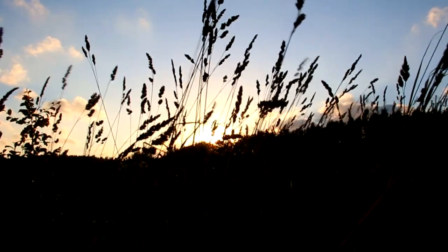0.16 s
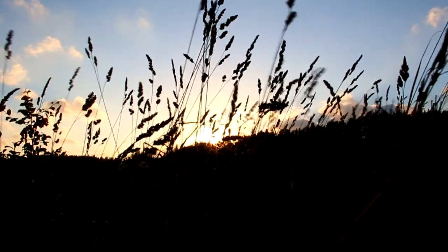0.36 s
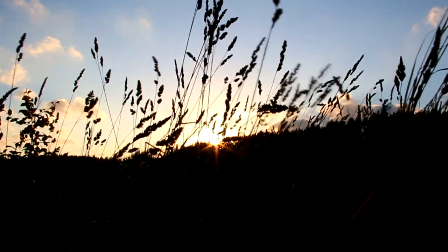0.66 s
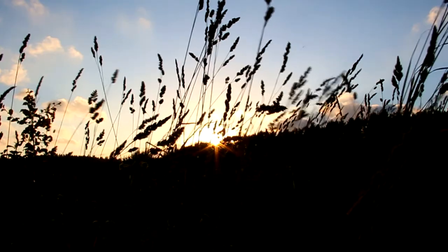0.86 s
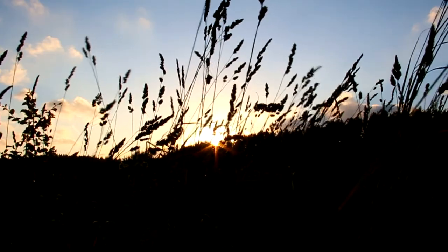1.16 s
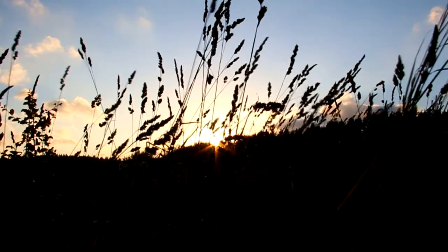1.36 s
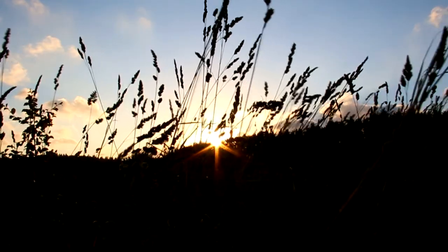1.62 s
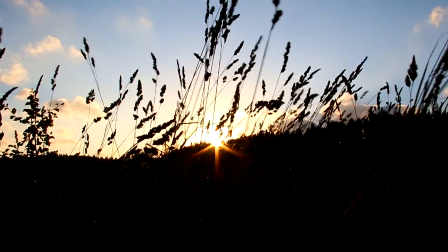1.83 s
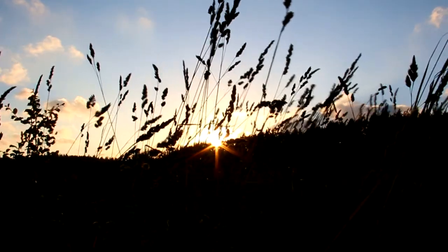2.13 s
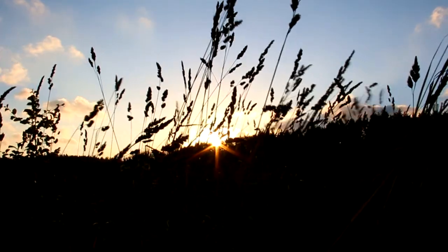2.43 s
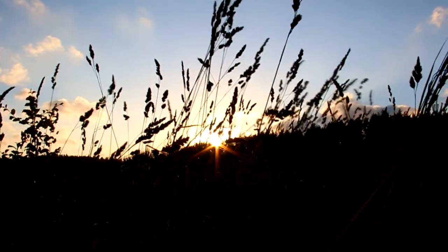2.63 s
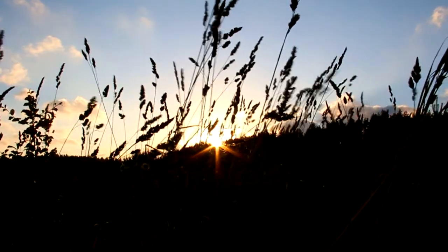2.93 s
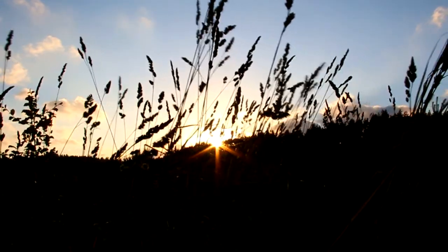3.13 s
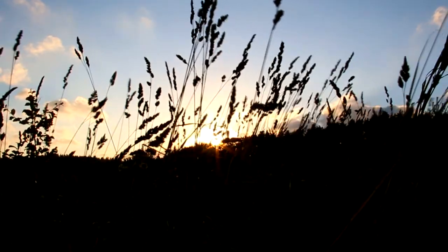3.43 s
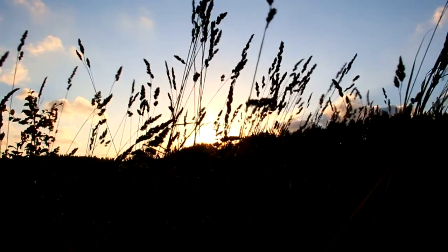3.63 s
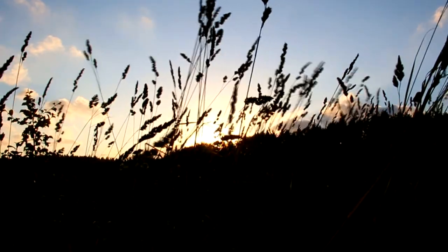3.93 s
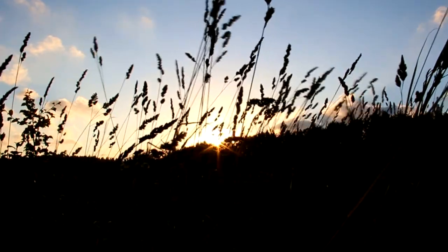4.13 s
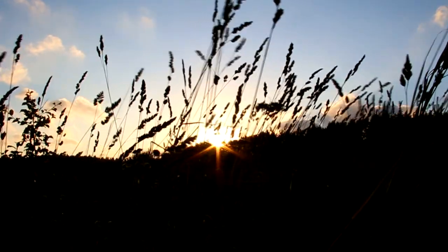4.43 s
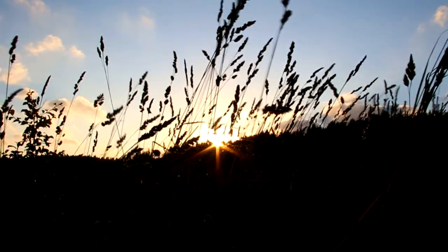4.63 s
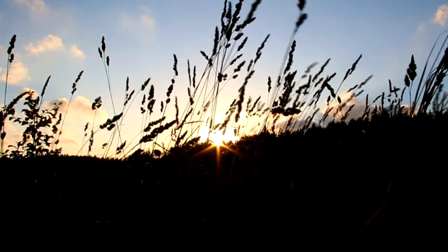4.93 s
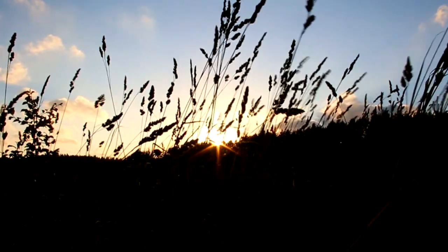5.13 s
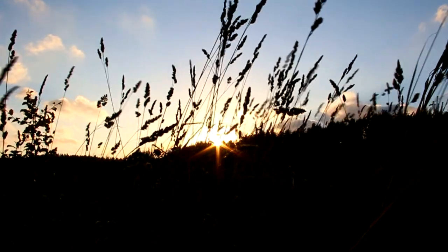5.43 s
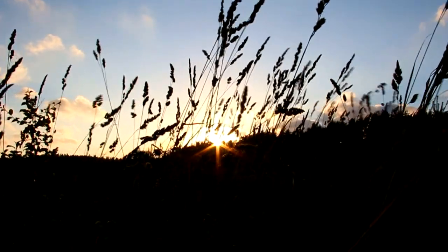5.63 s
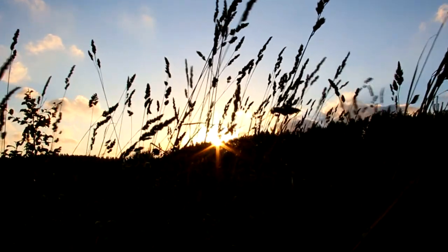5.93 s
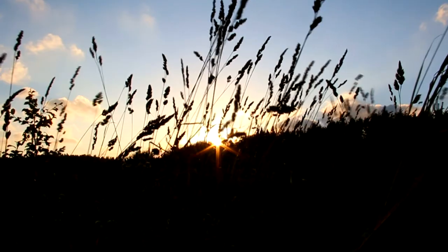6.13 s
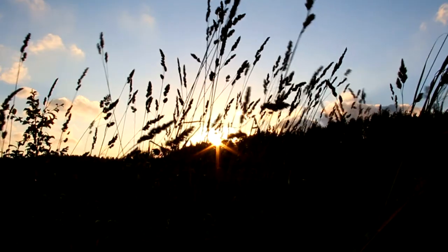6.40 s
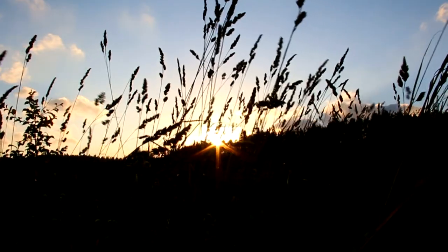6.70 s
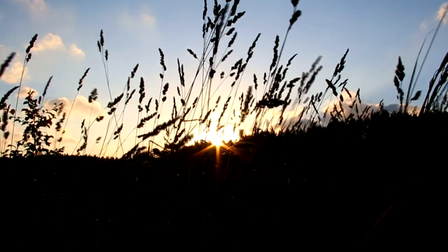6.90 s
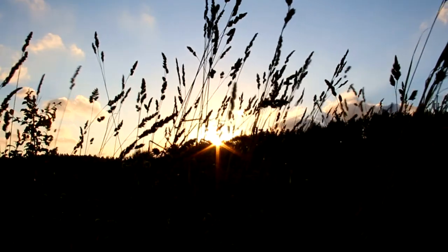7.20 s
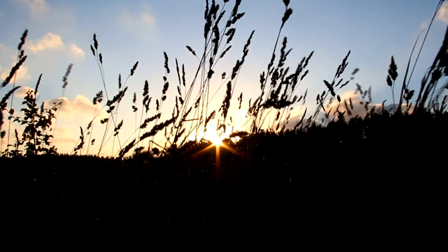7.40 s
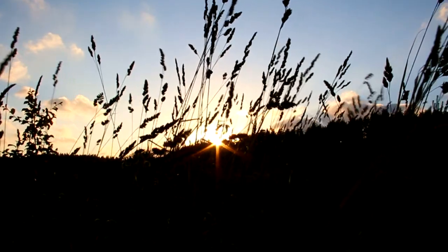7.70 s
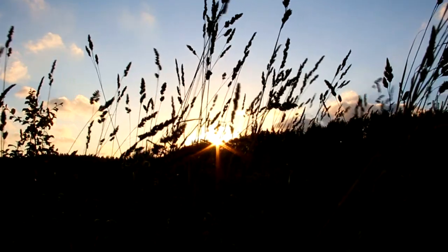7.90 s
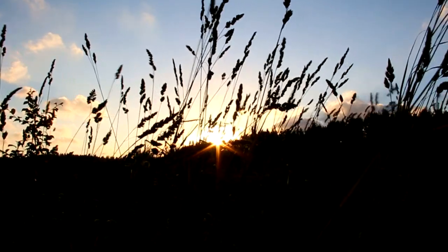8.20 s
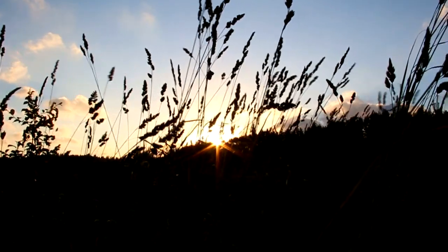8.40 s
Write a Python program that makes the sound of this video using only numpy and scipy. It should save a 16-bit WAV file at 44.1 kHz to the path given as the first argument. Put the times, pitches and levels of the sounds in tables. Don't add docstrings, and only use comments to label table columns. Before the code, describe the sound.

A wide stereo scene of birds at the edge of a wood by a meadow at dusk. From 0 to 1 s, small level pips ahead and soft, echoing whistles deep in the trees. At 0.7 to 2 s a high, thin warbler runs through hooked, falling slurs, while pips continue. Around 2.7 to 3.7 s a distant thrush gives mellow, sinking whistles. At 4 s a finch close on the right begins bright chips, growing louder, then a quick trill at 4.6 s, buzzy rolls from 5.1 s, snapping drops at 5.8 s and a flourish at 6.3 s. A nearer thrush whistles on the right. From 6.2 to 7.3 s rapid up-and-down syllables run on the left, with a second finch's chirps and churrs until 8 s. A blurred chorus swells around 5.3 to 7.3 s. The warbler returns faintly from 7.6 s. Low air rumble, distant traffic and hiss persist.

```python
import sys
import numpy as np
from scipy import signal
from scipy.fft import rfft, irfft, next_fast_len
from scipy.io import wavfile

SR = 44100
rng = np.random.default_rng(int(sys.argv[2]) if len(sys.argv) > 2 else 0)


def magnitude_from_level(level_db):
    exponent = np.asarray(level_db, float) / 20
    return 10 ** exponent


def digitize_waveform(pressure):
    field = np.atleast_2d(pressure).T
    bounded = np.clip(field, -1, 1)
    quanta = np.round(bounded * 32767).astype(np.int16)
    wavfile.write(sys.argv[1], SR, quanta)


N = 377055


def coloured(points, alike):
    hz, db = np.transpose(points)
    size = 2 * next_fast_len(N // 2 + 1)
    f = np.maximum(np.arange(size // 2 + 1) * SR / size, 1)
    gain = magnitude_from_level(np.interp(np.log(f), np.log(hz), db, left=-90, right=-90))
    one, left, right = irfft(rfft(rng.standard_normal((3, size))) * gain, size)[:, :N]
    out = np.sqrt(alike) * one + np.sqrt(1 - alike) * np.array([left, right])
    return out / out.std()


def flutter(rate_hz):
    low = signal.butter(2, rate_hz, fs=SR, output="sos")
    wobble = signal.sosfilt(low, rng.standard_normal((2, N)))
    return wobble / wobble.std()


def add_stroke(track, s, length, hz0, hz1, hz2, db, buzz=0., overtone_db=-42.):
    buzz_hz, swing_hz = 173, 480
    wander = .06
    lead = 1.26
    n = max(int(length * SR), 16)
    u = np.arange(n) / n
    hz = hz0 * (1 - u) * (1 - 2 * u) + 4 * hz1 * u * (1 - u) + hz2 * u * (2 * u - 1)
    turn = 2 * np.pi * buzz_hz * u * length + wander * np.cumsum(rng.standard_normal(n))
    phase = 2 * np.pi * np.cumsum(hz - buzz * swing_hz * np.cos(turn + lead)) / SR
    chop = 1 - min(buzz, .85) * np.abs(.5 + .5 * np.cos(turn)) ** 1.5
    swell = np.sin(np.pi * u) ** .5 * chop
    overtones = np.sin(2 * phase) + np.sin(3 * phase) * (hz < 5300)
    tone = np.sin(phase) + magnitude_from_level(overtone_db) * overtones
    i = max(int(s * SR), 0)
    track[i:i + n] += (magnitude_from_level(db + 4.5) * swell * tone)[:N - i]


def sing(notes=(), phrases=(), overtone_db=-54.0):
    track = np.zeros(N)
    for note in notes:
        add_stroke(track, *note, overtone_db=overtone_db)
    for strokes, cues in phrases:
        off_pitch = 1 + 0.0051 * rng.standard_normal(len(cues))
        for (s, cue_db, *share), bend in zip(cues, off_pitch):
            bend = bend * np.prod(share)
            for dt, length, a, b, c, db, buzz in strokes:
                add_stroke(track, s + dt, length, a * bend, b * bend, c * bend, db + cue_db, buzz, overtone_db)
    return track


def slides(rows, lift_hz=0., hold=0., buzz=0.):
    return [(s, length, a, (a + b) / 2 + lift_hz + hold * (a - b), b, db, buzz)
            for s, length, a, b, db in rows]


def level_whistles(rows, buzz=0., sag=0.):
    return [(s, length, hz * (0.95 + sag), hz, hz * (0.93 - sag), db, buzz) for s, length, hz, db in rows]


def wood(track, wet_db):
    trunk_t60_s, leaf_t60_s, gap_s = 1, 0.049, 0.0087
    t = np.arange(SR) / SR
    fade = magnitude_from_level(-60 * t / trunk_t60_s) + magnitude_from_level(9 - 60 * t / leaf_t60_s)
    tail = rng.standard_normal((2, len(t))) * fade * np.clip(t / gap_s, 0, 1)
    tail *= magnitude_from_level(wet_db) / np.sqrt(np.sum(tail ** 2, axis=1, keepdims=True))
    return signal.fftconvolve(track[None], tail, axes=1)[:, :N]


def placed(track, pan_db, wet_db, rough, late=0, shadow=((1000, 0, 0.),)):
    size = 2 * next_fast_len(N // 2 + 1)
    f = np.arange(size // 2 + 1) * SR / size
    hz, db, lead = np.transpose(shadow)
    response = magnitude_from_level(np.interp(f, hz, db)) * np.exp(1j * np.interp(f, hz, lead))
    left = irfft(rfft(np.roll(track, late), size) * response, size)[:N]
    direct = np.array([left * magnitude_from_level(pan_db / 2), track * magnitude_from_level(-pan_db / 2)])
    return direct * (1 + rough * flutter(166.0)) + wood(track, wet_db)


def air():
    # frequency in Hz, level in dB per Hz.
    air_curve = [(4.7, -48), (8.0, -4.5), (28, -5.5), (54, -25), (170, -43), (450, -41.5), (1600, -55.5),
                 (2080, -100)]
    # time in seconds, level in dB.
    gusts = [(0.0, -27), (0.36, -31), (2.66, -30), (3.31, -27.5), (3.45, -34), (3.67, -28.5), (4.55, -31),
             (8.43, -30), (8.55, -30)]
    # frequency in Hz, level in dB per Hz.
    hiss_curve = [(700, -7), (1500, -6), (3000, 2.5), (7000, -9), (10000, -10), (14000, -11),
                  (16000, -16.5)]
    low = signal.butter(2, 75, fs=SR, output="sos")
    wind = signal.sosfiltfilt(low, coloured(air_curve, 0.042))
    wash = coloured(air_curve, 0.41)
    wash = wash - signal.sosfiltfilt(low, wash)
    gust_s, gust_db = np.transpose(gusts)
    gust_db = np.interp(np.arange(N) / SR, gust_s, gust_db)
    ends = np.clip(np.minimum(np.arange(N), np.arange(N)[::-1]) / 1500, 0, 1)
    wind = wind * ends * magnitude_from_level(3.0 + 1.94 * (gust_db - gust_db.mean()))
    rumble = magnitude_from_level(-27.5) * (wind + wash * ends * magnitude_from_level(0.5))
    return rumble + coloured(hiss_curve, 0.12) * magnitude_from_level(-48.0)


def flock_loudness(rows, swell, fade):
    t = np.arange(0, N + 441, 441) / SR
    power = 0
    for s, hold, db in rows:
        bout_db = db - swell * np.maximum(s - t, 0) - fade * np.maximum(t - s - hold, 0)
        power = power + magnitude_from_level(bout_db) ** 2
    return np.interp(np.arange(N) / SR, t, np.sqrt(power))


def chorus(count=520):
    # centre in Hz, spread in Hz, note length in seconds.
    voices = [
        (1910, 157.4, 0.0292),
        (2500, 285.6, 0.01997),
        (3600, 535, 0.01598),
        (5200, 568, 0.0146),
    ]
    # start in seconds, hold in seconds, level in dB.
    flock_bouts = [
        [(1.1, 1.27, -52), (4.4, 0.26, -56.5), (6.5, 0.028, -46), (6.95, 0.25, -48.5), (7.5, 0.75, -52)],
        [(0., 0.34, -45.5), (2.7, 1.05, -44), (3.7, 1.6, -51), (5.8, 1.5, -35.5)],
        [(0., 0.41, -53), (2.2, 0.037, -44), (2.9, 2.7, -51.5), (4.1, 0.82, -47), (5.25, 1.5, -32.5), (6.9, 0.17, -37.5), (7.6, 1.3, -47.5)],
        [(1.2, 0.11, -61), (1.75, 0.35, -44.5), (4.45, 0.086, -39.5), (5.85, 0.046, -42), (7.6, 0.35, -54), (8.45, 0.11, -44.5)],
    ]
    swells = (22, 31.8, 24.3, 25.9)
    fades = (63, 12, 12, 40)
    out = 0
    for (centre_hz, spread_hz, length), rows, swell, fade in zip(voices, flock_bouts, swells, fades):
        scatter = 2.433 * (rng.random((count, 4)) - rng.random((count, 4)))
        notes = []
        for (s, r), (a, b, c, d) in zip(rng.random((count, 2)), scatter):
            slur = (b + np.sign(b)) * np.array([.6, 0.098 * c, -.6])
            pitches = centre_hz + spread_hz * (0.5995 * a + slur)
            notes.append((8.5 * s, length * (0.3894 + r), *pitches, 2 * d))
        crowd = sing(notes)
        far = wood(crowd, 0) + crowd * magnitude_from_level(-12)
        out = out + far / far.std() * flock_loudness(rows, swell, fade)
    return out


def pipit_and_ticks():
    # start in seconds, length in seconds, pitch in Hz, level in dB.
    pips = [(.001, 0.029, 4260, -43.5), (.221, 0.049, 4400, -46.5), (.656, 0.017, 4203, -27.5),
            (.681, .13, 4130, -53), (.924, 0.066, 4190, -41.5), (1.103, 0.048, 4193, -37.5),
            (1.319, 0.042, 4160, -40), (1.579, 0.039, 4110, -39), (1.874, 0.036, 4140, -38),
            (2.223, 0.093, 4050, -39), (2.644, 0.055, 4460, -45.5), (2.69, 0.13, 4930, -55),
            (3.643, 0.1, 4270, -48), (3.754, .047, 4160, -41), (3.972, 0.058, 4190, -44),
            (5.074, 0.059, 4630, -35), (5.826, 0.022, 4430, -33), (5.975, .018, 4500, -28),
            (6.031, 0.016, 4830, -31), (7.3, 0.059, 4100, -42.5), (8.027, 0.038, 4010, -45)]
    # start in seconds,
    # length in seconds, start in Hz, end in Hz, level in dB.
    ticks = [(.61, 0.027, 4570, 5700, -45), (.635, 0.022, 3200, 4600, -51), (7.742, 0.051, 6300, 6550, -37),
             (2.92, .07, 4500, 4150, -46), (4.195, 0.055, 4150, 3950, -37.5),
             (8.42, 0.124, 2450, 2720, -44.5), (2.665, .1, 2400, 2150, -37), (.855, .0096, 4850, 6000, -37),
             (.872, 0.0064, 4700, 3300, -32), (4.7, .026, 4740, 6200, -64), (8.4, 0.015, 4450, 5260, -35),
             (4.7, 0.0127, 7300, 4900, -41), (4.3, 0.0071, 5000, 6300, -40),
             (6.5, 0.0075, 4050, 8700, -38.5), (8.515, 0.035, 1470, 2050, -41.5)]
    first_s, gap_s, length = .068, .13, .025
    trill_tick = 5150, 4450, -53
    # offset from cue in seconds, length in seconds,
    # start, middle and end in Hz, level in dB, buzz 0-1.
    climb = [(0.015 * k, .017, 2300 + 95 * k, 2650 + 110 * k, 3000 + 125 * k, 0, 0.) for k in range(6)]
    # time in seconds, level in dB.
    climb_cues = [
        (4.237, -31.5),
        (4.917, -34),
    ]
    ticks = ticks + [(first_s + k * gap_s, length, *trill_tick) for k in range(4)]
    track = sing(level_whistles(pips) + slides(ticks), [(climb, climb_cues)])
    return placed(track * magnitude_from_level(-3.5), .2, 2.3, .4)


def deep_birds():
    # start in seconds, length in seconds, pitch in Hz, level in dB.
    deep = [(.005, 0.076, 2598, -35.5), (.09, 0.15, 2556, -39), (.22, 0.092, 2500, -38.5),
            (1.2, 0.14, 2060, -47), (2.773, 0.077, 2420, -36.5), (2.837, 0.078, 2300, -40),
            (2.902, .12, 2468, -38), (2.911, 0.079, 2130, -52), (3.032, 0.029, 2240, -34.5),
            (3.104, 0.029, 2200, -37), (3.165, 0.11, 2200, -44), (3.44, 0.11, 2213, -40),
            (3.603, .077, 2100, -52), (3.692, 0.049, 2100, -50)]
    # start in seconds, length in seconds, pitch in Hz, level in dB.
    deeper = [(0., .35, 2080, -47), (.06, .24, 2740, -40), (.33, .2, 2450, -44), (.381, .3, 1785, -53),
              (.95, .7, 2020, -54), (1.44, .29, 1640, -57), (1.701, .45, 2720, -51), (2.001, .4, 2070, -54),
              (3.25, .21, 2980, -48)]
    # start in seconds, length in seconds, pitch in Hz, level in dB.
    calls = [
        (2.29, .22, 4500, -42),
        (5.601, .6, 800, -59),
        (5.65, .55, 1250, -60),
    ]
    notes = level_whistles(deep, 0.085, sag=0.029)
    notes += level_whistles(deeper, .1) + level_whistles(calls, .3)
    return placed(sing(notes) * magnitude_from_level(-5.0), 1.8, 3.6, .6)


def high_warbler():
    # start in seconds, length in seconds, start in Hz, end in Hz, level in dB.
    hooks = [(.652, 0.14, 6280, 6070, -40.5), (.814, 0.082, 6240, 5620, -32),
             (1.567, 0.054, 6400, 5290, -32), (7.6, 0.12, 6500, 6130, -47), (7.79, .055, 6230, 5460, -36),
             (8.505, 0.083, 6100, 5970, -45)]
    # start in seconds, length in seconds, start in Hz, end in Hz, level in dB.
    slurs = [(.938, 0.068, 6150, 4910, -33.5), (1.398, 0.073, 6370, 4920, -34),
             (1.47, 0.046, 4880, 4060, -35.5), (1.659, 0.061, 6140, 5540, -33),
             (1.768, 0.049, 5920, 4360, -33), (1.86, 0.02, 5800, 5530, -33),
             (1.884, 0.019, 5100, 4600, -35), (1.95, 0.017, 5800, 5650, -33.5),
             (1.985, 0.017, 4800, 4440, -37), (2.04, 0.046, 5150, 4070, -41),
             (7.885, 0.064, 5950, 4520, -37.5), (8.378, 0.091, 6260, 4160, -40)]
    # offset from cue in seconds, length in seconds, start, middle and end in Hz,
    # level in dB, buzz 0-1.
    dive = [
        (0., 0.031, 8050, 7200, 6660, -5.5, 0.04),
        (.014, .098, 6850, 6340, 5950, 1.5, 0.13),
        (.086, .049, 6090, 5900, 5220, 2, 0.),
        (.135, 0.066, 5300, 4700, 4000, -0.5, 0.17),
    ]
    # time in seconds, level in dB.
    dive_cues = [
        (1.1, -34.5),
        (8.043, -39),
    ]
    track = sing(slides(hooks, lift_hz=482) + slides(slurs, hold=0.33), [(dive, dive_cues)])
    return placed(track * magnitude_from_level(-6.5), 4.1, 3.4, .5)


def left_birds():
    # start in seconds, length in seconds, foot in Hz, crest in Hz, level in dB.
    arches = [(0.874, 0.013, 3360, 5020, -34), (3.548, 0.12, 5960, 6550, -56),
              (7.444, 0.019, 3200, 5050, -22.5), (7.628, 0.15, 1712, 3486, -33.5),
              (7.913, 0.056, 2680, 3530, -35)]
    # start in seconds, length in seconds, start in Hz, end in Hz, level in dB.
    quips = [(6.625, 0.022, 4750, 6000, -41), (6.648, .006, 4700, 5600, -33), (7.07, .014, 5400, 4200, -44),
             (7.165, 0.015, 2900, 3100, -34), (7.18, 0.011, 2960, 3430, -30),
             (7.455, 0.015, 3800, 3730, -35), (6.7, 0.016, 2860, 3670, -24),
             (7.417, 0.0155, 6200, 4100, -27.5)]
    # start in seconds, length in seconds, start, middle and end in Hz, level in dB, buzz 0-1.
    churrs = [(6.671, 0.093, 5580, 5350, 4950, -35.5, .8), (7.525, .085, 3600, 3943, 4180, -24, 0.43),
              (7.6, 0.046, 4060, 3470, 3000, -30, 0.4), (7.952, 0.087, 2880, 2610, 2320, -36.5, 0.4)]
    dip = [(0., .016, 4460, 4030, 3730, 0, 0.)]
    flick = [(-.017, 0.0118, 3600, 3815, 4200, 2, 0.01), (-.008, 0.0094, 4000, 4650, 5200, -6, 0.013),
             (-.002, 0.0072, 3500, 4300, 5200, -8, 0.)]
    tumble = [
        (0., 0.023, 3070, 3350, 3270, 2, 0.),
        (.021, 0.014, 3240, 2790, 1950, -4, 0.),
        (.095, .014, 2100, 3300, 4500, -14, 0.),
    ]
    # time in seconds, level in dB and, for dips and flicks, pitch share.
    dip_cues = [(6.3, -36, 1.), (6.41, -32, 1.), (6.518, -28, 0.93), (6.624, -30, .98), (6.733, -31, 1.),
                (6.849, -30, .98), (6.978, -28, 0.86), (7.103, -33, 0.75), (7.24, -31, 0.89)]
    flick_cues = [(6.242, -36, 1.), (6.345, -24, 0.88), (6.451, -29, 1.02), (6.558, -25, 1.),
                  (6.667, -27, .97), (6.78, -27, 1.), (6.902, -25.5, .94), (7.035, -30, 0.83),
                  (7.167, -30.5, 0.84), (7.307, -30, 0.91)]
    tumble_cues = [(6.514, -29)]
    ups = [(s, length / 2, foot, crest, db) for s, length, foot, crest, db in arches]
    downs = [(s + half, half, crest, foot, db) for s, half, foot, crest, db in ups]
    notes = slides(ups + downs, lift_hz=130, buzz=.14) + churrs + slides(quips)
    track = sing(notes, [(flick, flick_cues), (dip, dip_cues), (tumble, tumble_cues)])
    return placed(track * magnitude_from_level(-5.0), 7.6, -0.74, .4, late=-2)


def nearer_thrush():
    # start in seconds, length in seconds, pitch in Hz, level in dB.
    whistles = [(3.988, .047, 2448, -31), (4.048, 0.018, 2300, -41), (4.1, 0.028, 2420, -29),
                (4.167, 0.079, 2380, -34.5), (4.554, 0.065, 2280, -36), (4.663, 0.13, 2436, -31.5),
                (4.812, 0.16, 2400, -37), (5.595, 0.043, 2344, -30), (5.719, 0.017, 2386, -25),
                (6.44, 0.066, 2310, -34), (6.709, 0.11, 2390, -38), (7.125, 0.048, 2173, -33.5),
                (7.271, 0.09, 2152, -37)]
    return placed(sing(level_whistles(whistles, 0.2)) * magnitude_from_level(-7.0), -7.0, 5.5, 0.38)


def finch_buzzes():
    # start in seconds, crest in Hz, level in dB, depth share.
    buzzes = [(5.06, 4500, -14, 1.42), (5.231, 4365, -15.5, 1), (5.432, 4396, -16.5, 1),
              (5.623, 4250, -19, 1.1)]
    length, tip_s, depth = .058, 0.0242, 0.7
    notes = []
    for s, hz, db, share in buzzes:
        notes.append((s, length, hz * 0.94, hz * 0.98, hz, db, share * depth))
        notes.append((s + length - 0.009, tip_s, hz, hz * 0.95, hz * 0.87, db - 1.5, share * depth))
    return notes + level_whistles([(s, length, 6840, db - 31) for s, hz, db, share in buzzes], 1.0)


def rasp(track, db):
    loud = np.tanh(3 * track / np.abs(track).max())
    smear = flutter(550)
    breath = loud ** 2 * smear[0] + 2.6 * loud ** 3 * smear[1]
    high = signal.butter(6, 6000, "high", fs=SR, output="sos")
    return track + magnitude_from_level(db) * signal.sosfilt(high, breath)


def close_finch():
    # offset from cue in seconds, length in seconds, start, middle and end in Hz,
    # level in dB, buzz 0-1. The slip is a lower first drop; a level low heel ends every drop.
    chip = [
        (-.038, 0.029, 5550, 6230, 7140, -17, 1.2),
        (-.002, 0.014, 4010, 4600, 5850, -6, 0.36),
        (.012, 0.018, 5400, 4640, 4680, -8, 0.),
    ]
    trill = [(-.013, 0.0195, 4260, 4184, 4160, -11.5, 0.0043), (-.004, .013, 4050, 3864, 3790, -2.5, 0.027),
             (.004, 0.0077, 8100, 6200, 4830, -27.5, 0.0067), (.007, .007, 3600, 3050, 4200, -17, 0.),
             (.011, 0.011, 4030, 4490, 4380, -1.5, 0.0095)]
    roll = [(-.037, 0.026, 3780, 3330, 2930, 4.5, 0.23), (-.016, .017, 2963, 2653, 2266, -4.5, 0.032),
            (0., 0.0163, 2413, 3103, 3250, 2.5, 0.), (.013, 0.024, 3240, 3400, 3350, 1.5, 0.1),
            (.038, 0.035, 3350, 3300, 3280, -3.5, 0.32)]
    drop = [(-.012, 0.0052, 3600, 4120, 5070, 3.5, 0.0017), (-.009, 0.0064, 4650, 5500, 6250, -19, 0.),
            (-.003, .008, 3600, 3650, 3450, 9, 0.), (.002, .011, 3420, 3010, 2430, 7, 0.012)]
    slip = [(-.012, 0.0054, 3600, 4080, 5070, -9, 0.), (0., .009, 3150, 3170, 2870, 1, 0.),
            (.006, .012, 2817, 2600, 2430, -5, 0.)]
    heel = [(0., .024, 2340, 2280, 2196, 0, 0.023)]
    flourish = [(0., .011, 4500, 5360, 7500, -17, 0.), (.005, 0.014, 3800, 5070, 5200, -4, 0.42),
                (.021, 0.014, 4300, 6240, 8260, -10.5, 0.014), (.038, 0.011, 5500, 4460, 3900, -1.5, 0.),
                (.03, 0.04, 3130, 3200, 3120, -6, 0.), (.057, .016, 2590, 3500, 5230, -1, 0.),
                (.072, 0.03, 4710, 3190, 2880, 2, 0.3), (.098, .07, 2950, 2430, 2300, -5.8, 0.45)]
    # time in seconds, level in dB and, for chips, pitch share.
    chip_cues = [(4.0188, -25.5, 1.01), (4.151, -18.5, 0.99), (4.274, -13, 0.98), (4.4007, -13, 1.003),
                 (4.5286, -10.5, 0.99)]
    trill_cues = [(4.6189, -14), (4.693, -14.5), (4.7665, -14.5), (4.8385, -15), (4.9104, -14.5),
                  (4.985, -14)]
    roll_cues = [(5.149, -22), (5.335, -21.5), (5.529, -21), (5.718, -21.5)]
    drop_cues = [(5.891, -26.5), (5.981, -30), (6.071, -31.5), (6.166, -31)]
    slip_cues = [(5.805, -16.5)]
    heel_cues = [(5.819, -23), (5.903, -23), (5.992, -33), (6.083, -24.5), (6.177, -32)]
    flourish_cues = [(6.265, -21)]
    # frequency in Hz, level in dB,
    # lead over the right in radians.
    left_shadow = [(2250, -3, 1.2), (2600, -3.5, -.1), (3200, -8, -1.1), (3600, -16, -.1), (3950, -14, -.3),
                   (4450, -10, .1), (5000, -6, -.4), (8000, -7, 0.)]
    phrases = [(chip, chip_cues), (trill, trill_cues), (roll, roll_cues), (drop, drop_cues),
               (slip, slip_cues), (heel, heel_cues), (flourish, flourish_cues)]
    track = rasp(sing(finch_buzzes(), phrases, overtone_db=-82.0), -40.5)
    return placed(track * magnitude_from_level(-.5), 0, -10, .22, shadow=left_shadow)


def scene():
    birds = close_finch() + left_birds() + high_warbler()
    birds += pipit_and_ticks() + nearer_thrush() + deep_birds()
    return birds + chorus() + air() * magnitude_from_level([[-.5], [.5]])


def low_pass(x):
    return signal.sosfilt(signal.butter(12, 15850, fs=SR, output="sos"), x)


def record(dry):
    return low_pass(dry)


dry = scene()
out = record(dry)
digitize_waveform(out)
```